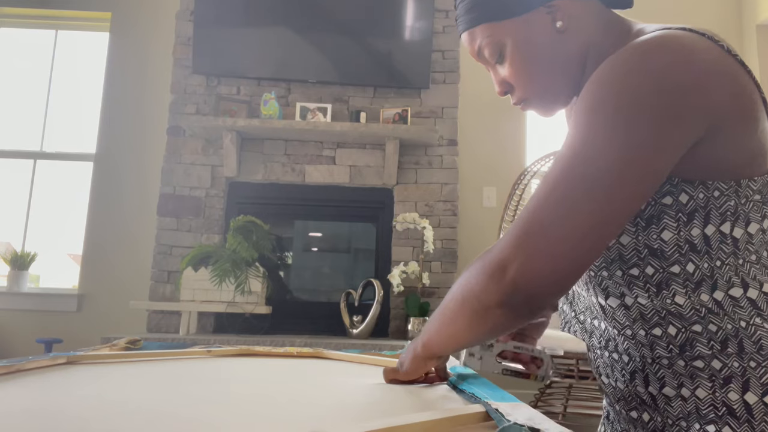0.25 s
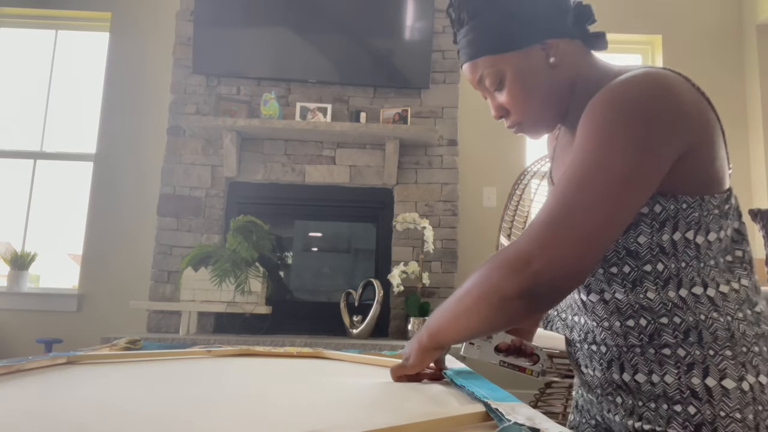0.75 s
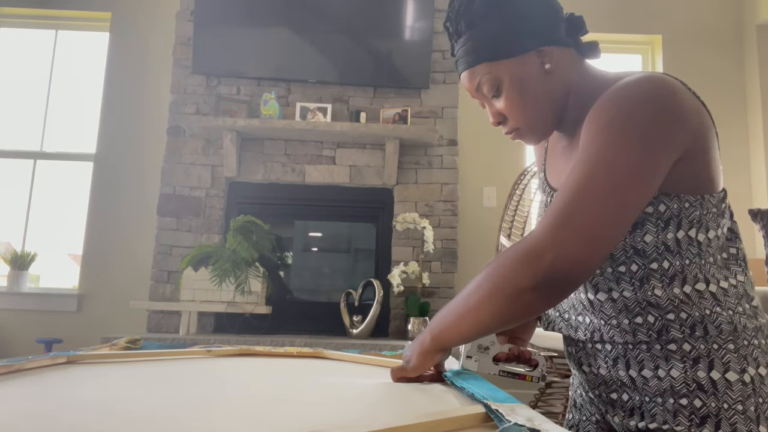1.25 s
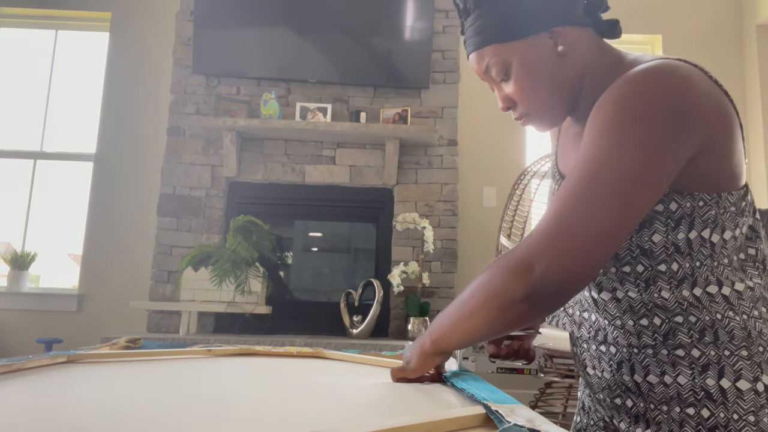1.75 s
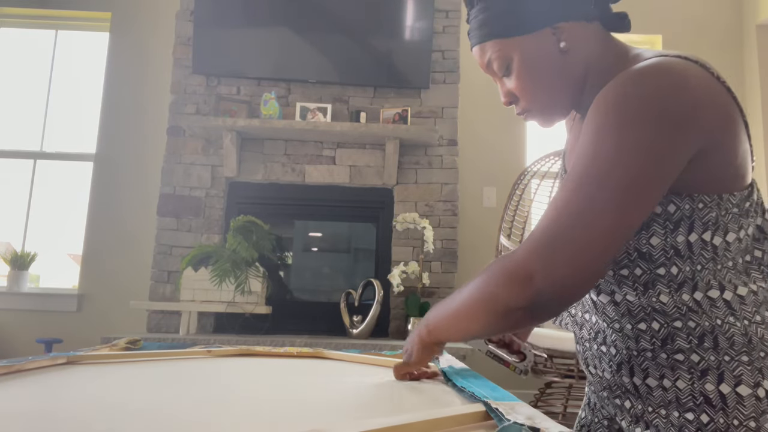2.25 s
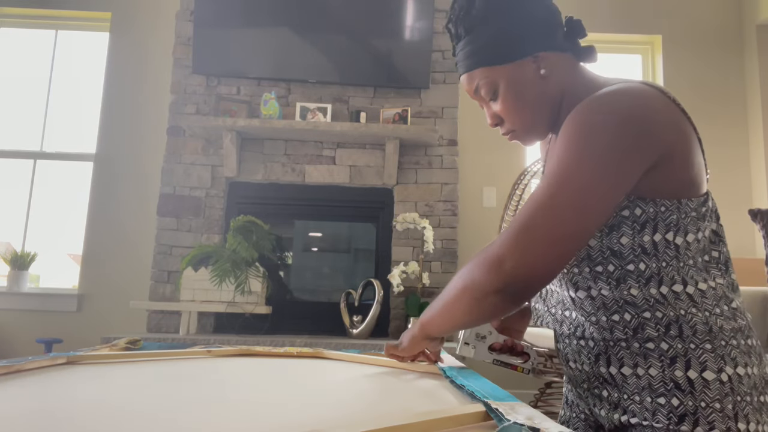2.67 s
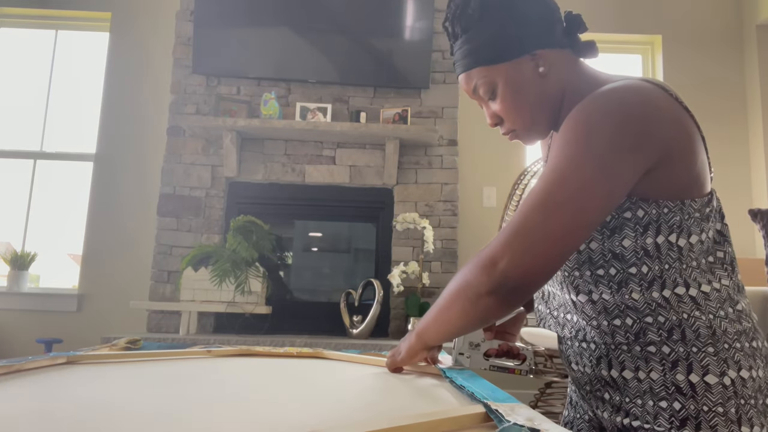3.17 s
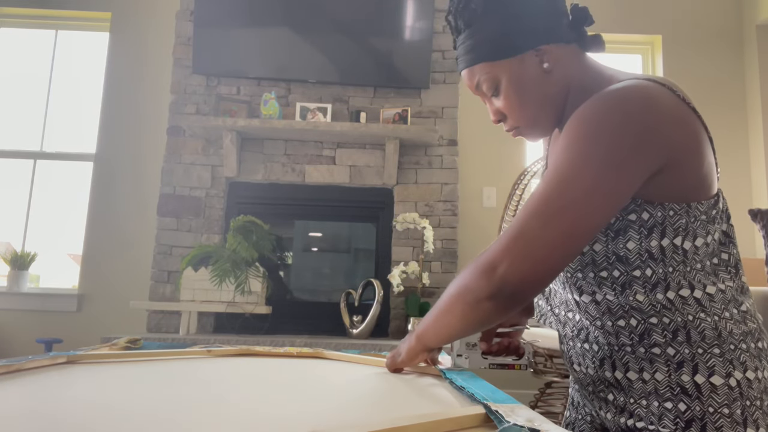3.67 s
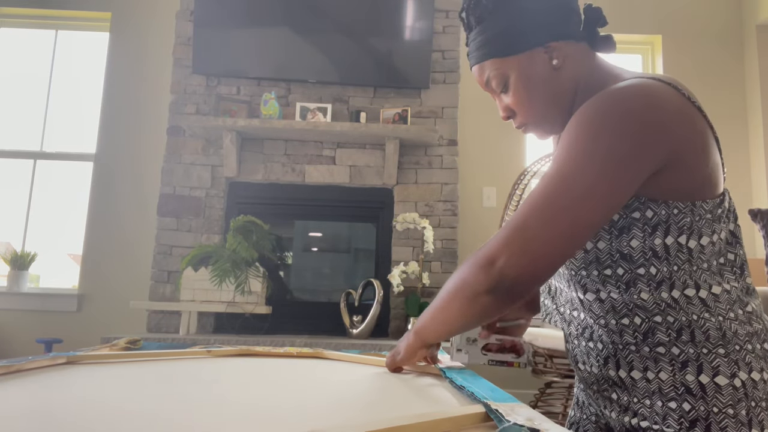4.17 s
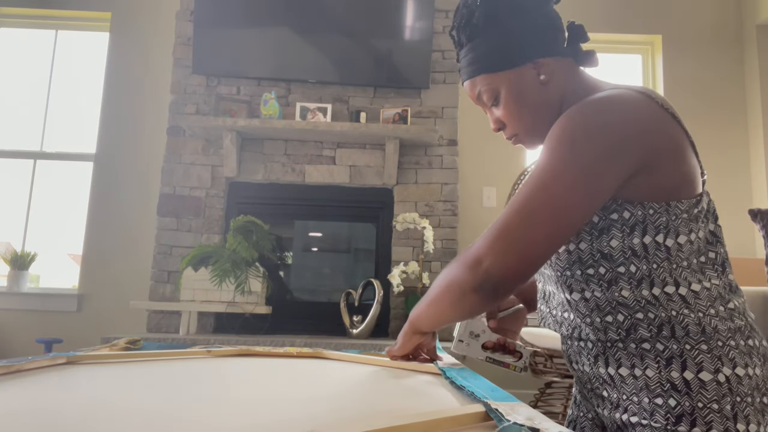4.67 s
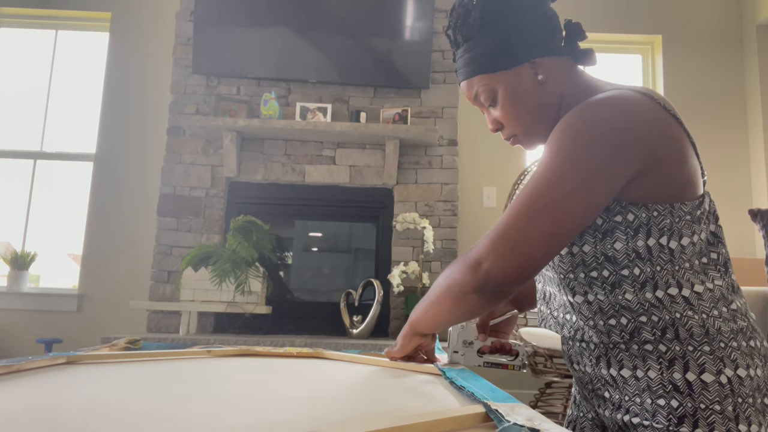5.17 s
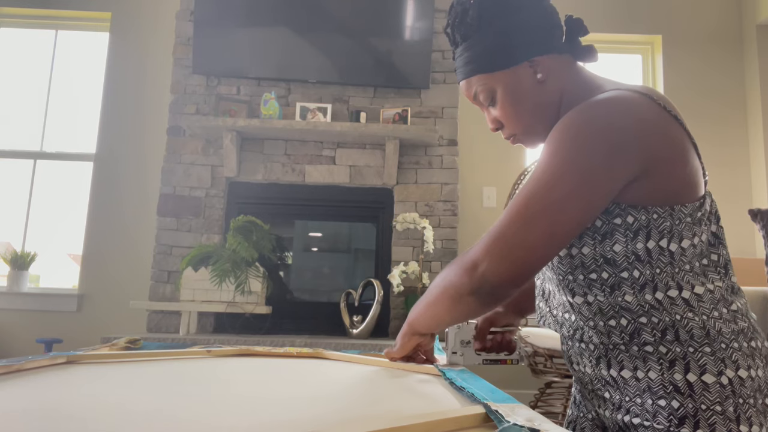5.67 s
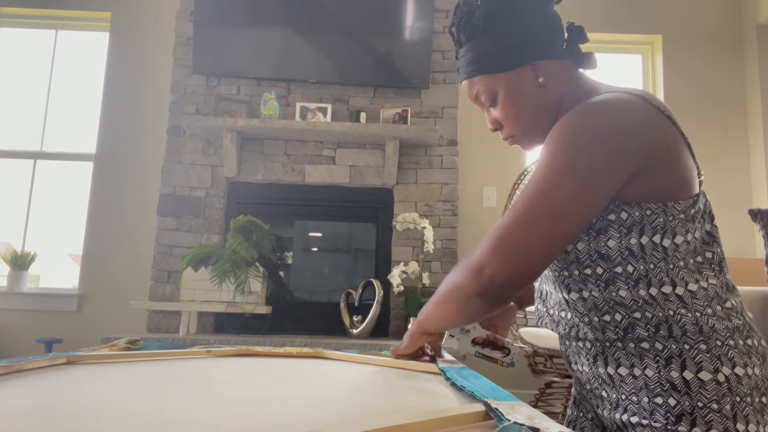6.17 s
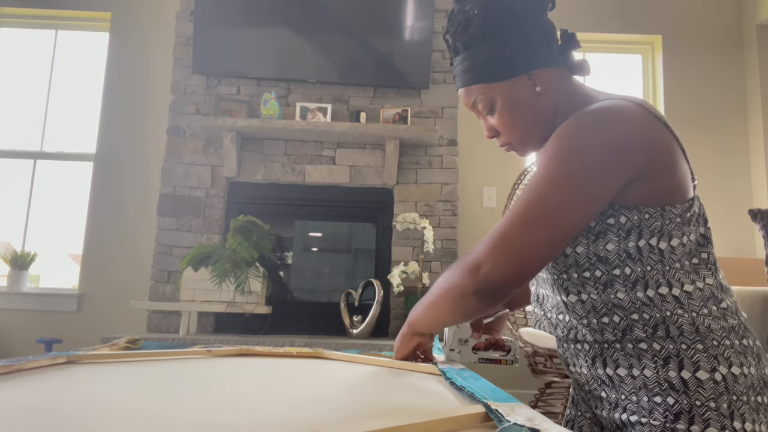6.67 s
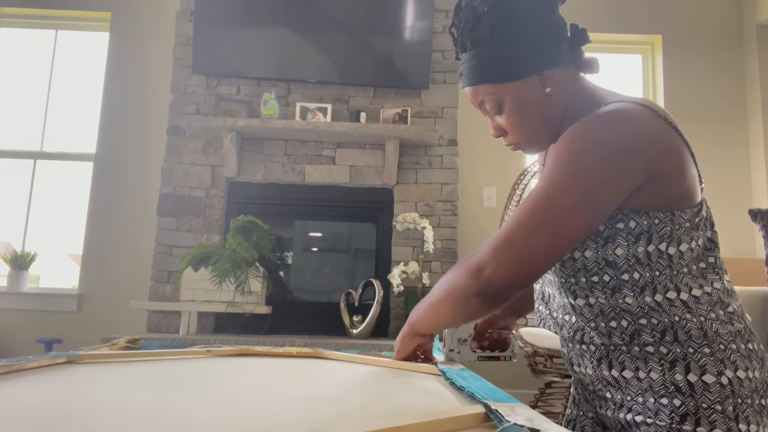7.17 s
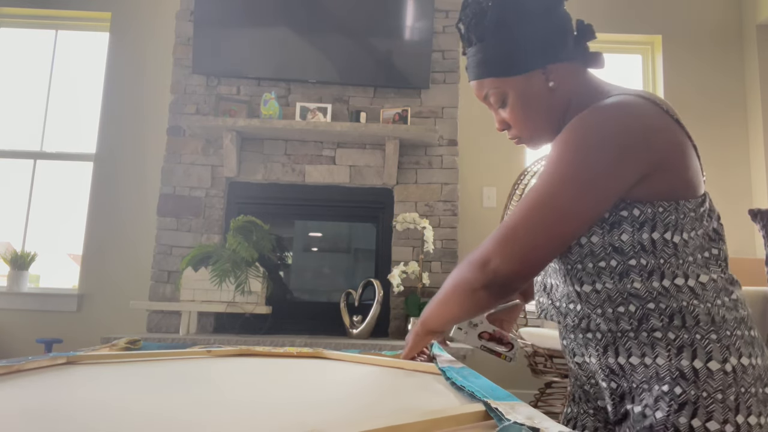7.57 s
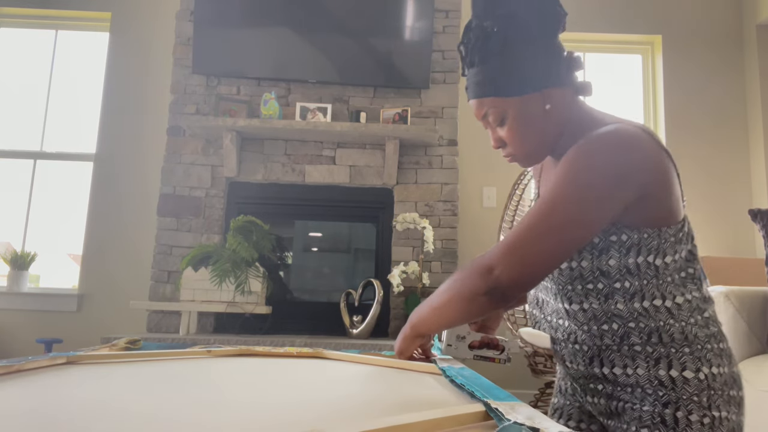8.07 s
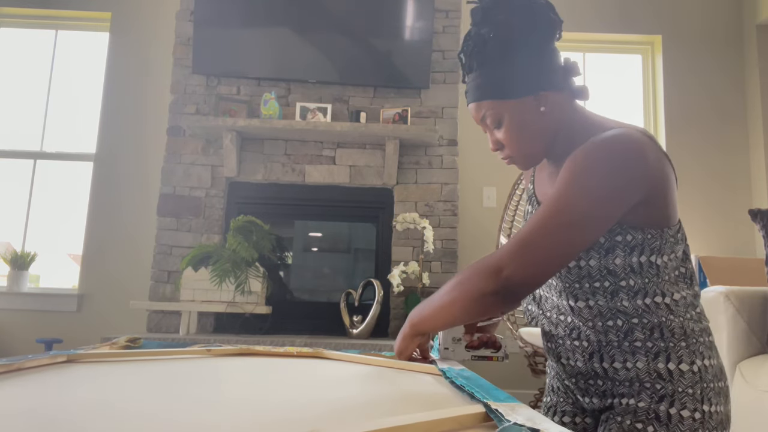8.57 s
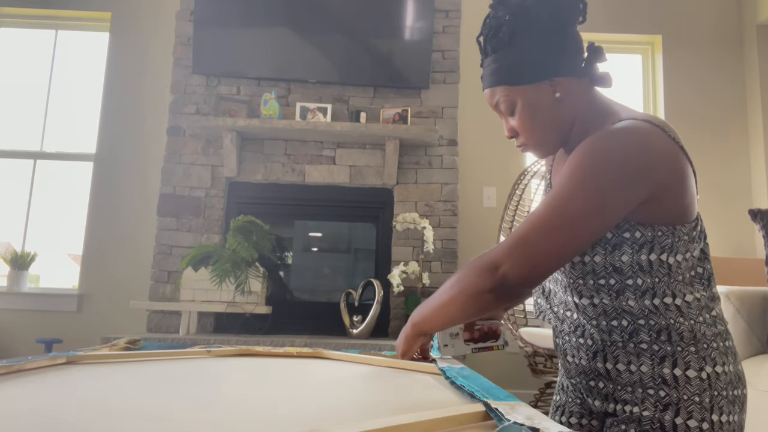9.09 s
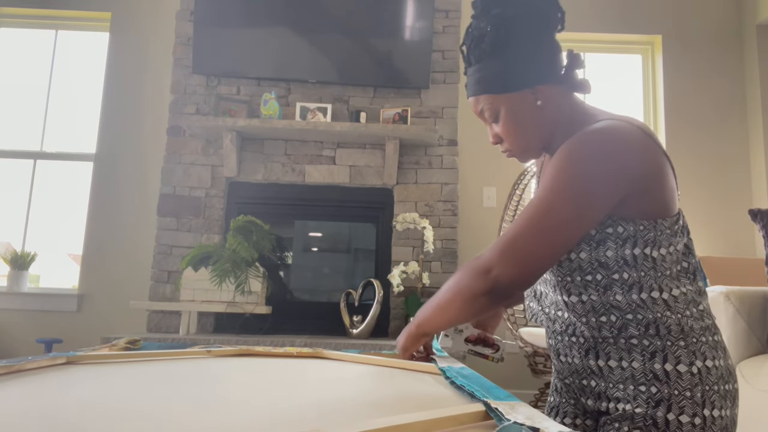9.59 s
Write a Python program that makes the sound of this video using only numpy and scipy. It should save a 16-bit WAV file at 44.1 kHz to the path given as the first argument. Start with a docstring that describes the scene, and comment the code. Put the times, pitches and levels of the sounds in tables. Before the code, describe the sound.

A hand staple gun slams staples into a wooden frame about every two seconds in a lively living room, each squeeze creaking and cocking first.

```python
"""A hand staple gun works along a wooden frame on a table in a large, lively living room with a low hum.
We come in on the ring of a slam; the handle then snaps back, faint pings, ticks and soft bumps follow,
and the next squeeze creaks and cocks before a staple slams home; five such rounds follow the first slam.
Blows are noisy contacts plus ringing modes of steel, casing and wood; cloth brushes before the last slam.
Walls and a dense tail answer each blow, and the recorder's gain control ducks the loud ones."""
import sys
import numpy as np
from scipy import signal
from scipy.fft import rfft, irfft
from scipy.io import wavfile
from scipy.ndimage import uniform_filter1d, minimum_filter1d

SR = 44100
rng = np.random.default_rng(int(sys.argv[2]) if len(sys.argv) > 2 else 0)


def wav_record(signal):
    """Record a signal, one row per channel, as 16-bit PCM in the file named by sys.argv[1]."""
    frames = np.transpose(np.atleast_2d(signal))
    bounded = np.clip(frames, -1, 1)
    # unit amplitude maps onto the largest positive 16-bit level
    quanta = np.round(bounded * 32767).astype(np.int16)
    wavfile.write(sys.argv[1], SR, quanta)


N = 433503
LEAD = SR // 4  # samples computed before time zero and cut off at the end
RUN_UP = 700  # samples of quick rise before a blow
BLOW = 6000  # samples in one blow
CREAK_SWELL_DB = 23.5  # rise of the run-up of catches and ticks over one rattle length
PORT_GAIN_DB = [[0], [0], [-4.0]]  # left port, right port, room

# ringing steel parts of the gun: (frequency [Hz], strength [dB], t60 before damping [s])
STEEL_MODES = [(3187, 2, 0.038), (3726, 3.5, 0.026), (3875, 9, 0.041), (4140, -4, 0.061),
               (4640, -2.5, 0.037), (6320, -13.5, 0.043), (7600, -8.5, 0.021), (11000, -2.5, 0.036),
               (11400, -3, 0.023)]
# ringing wood of the frame: (frequency [Hz], strength [dB], t60 before damping [s])
FRAME_MODES = [(108.4, -5.5, 0.13), (162, -5, 0.13), (204.5, -5, 0.18), (239, -2, 0.08), (314.2, 0, 0.081),
               (386, -6, 0.11), (443, 1.5, 0.052), (488, -9.5, 0.15), (547, 6.5, 0.047),
               (679, -16.5, 0.069), (736, 10, 0.019), (937, -7, 0.095), (1072, -7, 0.15)]


def amp(db):
    """Turns decibels into an amplitude factor."""
    return 10 ** (np.asarray(db) / 20)


def evened(x):
    """Scales a signal to an rms of one."""
    return x / np.sqrt(np.mean(x ** 2) + 1e-20)


def read(points, hz):
    """Reads a curve of (frequency, value) points along a logarithmic frequency axis."""
    f, value = np.transpose(points)
    return np.interp(np.log(hz + 1), np.log(f + 1), value)


def add(mix, s, sound):
    """Lays a sound into the rows of a mix at a time in seconds."""
    start = LEAD + round(s * SR)
    part = mix[:, start:start + sound.shape[-1]]
    part += sound[..., :part.shape[1]]


def loudest(x):
    """The rms amplitude of the loudest 4 ms."""
    return np.sqrt(uniform_filter1d(x ** 2, size=176).max())


def peaked(x, db):
    """Scales a sound so that its loudest 4 ms have the given level."""
    return x * amp(db) / loudest(x)


def patchwork(shape, size_hz, size_time):
    """Random unevenness, smooth over some neighbouring bands and moments."""
    noise = rng.standard_normal(shape)
    across_bands = uniform_filter1d(noise, size=size_hz, axis=0)
    return evened(uniform_filter1d(across_bands, size=size_time, axis=1))


def pair(shape, same):
    """Random spectra for two microphone ports that agree by the share 'same'."""
    a, b, c, d = rng.standard_normal((4,) + shape)
    same = np.clip(same, -1, 1)
    left = a + 1j * b
    return np.array([left, same * left + np.sqrt(1 - same ** 2) * (c + 1j * d)])


def hum():
    """Low household hum: noise with booming pitches, patchy in time and pitch."""
    # spectrum of the hum: (frequency [Hz], density [dB per Hz, relative])
    hum_spectrum = [(18, -43.5), (30, -12.5), (62, -2.5), (165, -6.5), (187, -16), (246, -1.5),
                    (286, -13.5), (761, -25.5), (863, -30), (1500, -30), (1900, -42.5), (12000, -70),
                    (15600, -104), (22000, -120)]
    # booming pitches: (frequency [Hz], width [Hz], boost [dB])
    hum_peaks = [(53.5, 42, 7), (161.6, 3.2, 8), (234, 25, 4)]
    # likeness of the two ports: (frequency [Hz], likeness [-1 to 1])
    hum_same = [(60, 0.88), (180, 0.56), (550, 0.0), (1650, 0), (4970, 0.084), (15000, 0.093)]
    # balance of the ports: (frequency [Hz], left minus right [dB])
    hum_balance = [(60, 3.5), (240, 4.5), (950, -2), (3770, 3.5), (15000, 3.5)]
    level_db = -47
    frames = (N + LEAD) // 1024 + 5
    hz = np.fft.rfftfreq(4096, 1 / SR)[:, None]
    patches_db = 2.5 * patchwork((2049, frames), 9, 5)
    booms_db = sum(db / (1 + (2 * (hz - f) / width) ** 2) for f, width, db in hum_peaks)
    spectra = pair((2049, frames), read(hum_same, hz))
    spectra = spectra * amp(read(hum_spectrum, hz) + booms_db + patches_db)
    spectra = spectra * amp(np.multiply.outer([.5, -.5], read(hum_balance, hz)))
    return amp(level_db) * evened(signal.istft(spectra, nperseg=4096, noverlap=3072)[1][:, :N + LEAD])


def rung(modes, rise, ring=1, pitch=1, spread=0.057, late=0):
    """Every mode rings after a short rise, a little off pitch and strength from blow to blow.
    With 'late', low modes come up later, as slow bending waves do in wood."""
    hz, db, t60 = np.transpose(modes)[:, :, None]
    strength, detune, phase = rng.standard_normal((len(modes), 3)).T[:, :, None]
    n = np.arange(3000)
    t = n / SR
    rise_s = rise * (500 / hz) ** late
    shape = (1 - np.exp(-(t / rise_s) ** 2)) * np.exp(-np.log(1000) * t / (ring * t60))
    waves = np.sin(2 * np.pi * (hz * pitch * (1 + spread * detune) * t + phase))
    tones = amp(db + 2 * strength) * shape * waves
    fade = np.minimum((3000 - n) / 600, 1)
    return np.pad(tones.sum(0) * fade, (0, 3000))


def ringing(modes, db, rise, room_db, blur, ring=1, pitch=1, spread=0.033, late=0):
    """Rows: the ring at the left and right port, and its even spectrum summed over all directions for the room."""
    shared, other = (rung(modes, rise, ring, pitch, spread, late) for _ in range(2))
    near = np.array([shared + 0.18 * other, shared - 1.1 * other])
    near = near * amp(db) / loudest(near[1])
    f = np.fft.rfftfreq(BLOW, 1 / SR)
    power = 0
    for hz, level_db, t60 in modes:
        off_pitch = (f - hz * pitch) * ring * t60 / blur
        power = power + amp(2 * level_db) * t60 ** 2 / (1 + off_pitch ** 2) ** 2
    far = np.roll(irfft(np.sqrt(power)), 600) * signal.windows.tukey(BLOW, .1)
    far = amp(room_db) * far * np.linalg.norm(near[1]) / np.linalg.norm(far)
    return np.array([*near, far])


def wood(db, rise, ring=1, pitch=1, modes=FRAME_MODES, late=0.22):
    """The frame knocks: its wooden modes ring, the low ones rising later."""
    return ringing(modes, db, rise, -4.5, 7.0, ring, pitch, late=late)


def thud(db, pitch=1):
    """A push runs along the wood as a bending wave: the highs arrive first, the lows drag behind."""
    centre_hz, octaves = 399.8 * pitch, .58
    drag = .85  # bending waves take drag / sqrt(Hz) seconds, counted from twice the centre pitch
    hz = np.fft.rfftfreq(BLOW, 1 / SR) + 1
    delay_s = drag * np.maximum(hz ** -.5 - (2 * centre_hz) ** -.5, 0) + .002
    shape = np.exp(-(np.log2(hz / centre_hz) / octaves) ** 2 / 2)
    # the phase is the running sum of the delay over frequency
    wave = irfft(shape * np.exp(-2j * np.pi * np.cumsum(delay_s) * SR / BLOW))
    return peaked(wave, db) * amp([[-1.5], [0], [-4.]])


def sway(db, late_s=0.065):
    """The table rocks a moment after a blow: a short 62 Hz swell, 1.6 times the given level at its height."""
    t = np.arange(8000) / SR
    return amp(db) * 1.6 * np.exp(-((t - late_s) / 0.011) ** 2) * np.sin(2 * np.pi * 62 * t)


def blow(crack, steel_db, length, frame_db, casing_db, bright_db, ring_db, pitch=1, swell_db=48, damping=0.57):
    """A rattle of contacts rises quickly and cracks, and rings the steel, the casing and the wood.
    Rows: left port, right port, and the even spectrum that all directions together send to the room."""
    # hollow gun casing: (frequency [Hz], strength [dB], t60 before damping by the gripping hand [s])
    casing_modes = [(1240, -4.5, 0.064), (1374, 2.5, 0.034), (1560, 0.5, 0.039)]
    own = 0.84  # what each port hears alone, against what both share
    length = max(length, .001)
    n = np.arange(BLOW)
    u = (n - RUN_UP) / SR / length  # time in rattle lengths
    shared, left, right = rng.standard_normal((3, BLOW))
    swell = np.where(u < .3, amp(swell_db * (u - .3) - 4), np.exp(-(1.1 * (u - .3)) ** 2))
    contacts = amp(3.5 * rng.standard_normal(375)).repeat(16) * swell
    impulse = n == RUN_UP + 200
    rattle = np.array([(shared + own * left) * contacts, (shared + own * right) * contacts, impulse])

    hz = np.fft.rfftfreq(BLOW, 1 / SR)
    tilt_db = bright_db * np.log2((hz + 1) / 5000)  # per octave
    snap = irfft(rfft(rattle) * amp(read(crack, hz) + tilt_db)) * signal.windows.tukey(BLOW, .1)
    snap = amp(steel_db) * np.sqrt(0.59 * length * SR) * snap / np.linalg.norm(snap, axis=1, keepdims=True)

    # the steel list stands twice: each part rings as a cluster
    steel = ringing(2 * STEEL_MODES, steel_db + ring_db, .8 * length, 6.0, 5.7, pitch=pitch, spread=0.036)
    casing = ringing(casing_modes, casing_db, 0.34 * length, -8.0, 3.8, damping, spread=0.017)
    rings = steel + casing + wood(frame_db, 1.6 * length)
    return snap + np.pad(rings, ((0, 0), (RUN_UP, 0)))[:, :BLOW]


def slams(tracks):
    """The driver slams a staple home, hits its stop, thuds through the wood and rocks the table."""
    # driver slams: (time [s], steel [dB], rattle length [s], frame [dB], casing [dB], brightness [dB per octave],
    # table sway before its gain [dB], thud [dB], factor on the pitch of the thud)
    slam_list = [(-.095, 0, 0.0024, -12, -15, -1, -35, -19.5, 0.72),
                 (1.7669, -5.5, 0.007, -19, -26.5, -2, -25.5, -18.5, .7),
                 (3.8636, -6, 0.0042, -18, -22.5, 1.5, -24.5, -21, 0.798),
                 (5.5932, -4.5, 0.0044, -17, -19.5, -1, -29, -20.5, .9),
                 (6.9895, -5.5, 0.0045, -17.5, -16.5, 1.4, -30, -19.5, 1.07),
                 (8.8069, -7.5, 0.0067, -18, -15, 0.8, -30, -21, 1.5)]
    # strike spectrum of steel on steel: (frequency [Hz], density [dB per Hz, relative])
    slam_crack = [(880, -15), (1500, -4.5), (3250, 1.5), (3590, 4), (5180, -4), (5970, -3.5), (8870, -11),
                  (12500, 1.5), (13300, -15.5), (14300, -29.5), (15000, -19), (16000, -24), (17000, -62)]
    ring_db, swell_db = -22.5, 21  # steel ring against the crack; rise of the run-up over one rattle length
    room_gain_db = 5.5  # slams fill the room more than they reach the microphones
    seat_s, seat_db, seat_spread = .0055, -6.5, .2  # the driver hits its stop just after the staple bites
    for k, (s, *row, sway_db, thud_db, pitch) in enumerate(slam_list):
        track, ports = tracks[k % 3], tracks[k % 3, :2]
        start_s = s - RUN_UP / SR
        add(track, s, thud(thud_db, pitch))
        slam, seat = (blow(slam_crack, *row, ring_db, swell_db=swell_db, damping=1.0) for _ in range(2))
        add(track, start_s, slam * amp([[0], [0], [room_gain_db]]))
        seat_delay_s = seat_s * (1 + seat_spread * rng.uniform(-1.2, 1))
        add(ports, start_s + seat_delay_s, amp(seat_db) * seat[:2])
        add(ports, s, sway(sway_db))


def releases(tracks):
    """The handle snaps back, steel and casing ringing, and bounces once."""
    # handle snaps: (time [s], steel [dB])
    release_list = [(0.2392, -16.5), (2.105, -17.5), (4.188, -18), (5.9361, -16), (7.3453, -17.5),
                    (9.1689, -16)]
    # strike spectrum of the snap: (frequency [Hz], density [dB per Hz, relative])
    release_crack = [(880, -18), (1360, -8.5), (2000, -8), (3000, -6.5), (3920, -9), (4500, -14),
                     (5000, -11), (5600, -12), (6260, -9.5), (6700, -18.5), (7250, -7), (8000, -15),
                     (9150, -29.5), (10300, -1), (11300, -13.5), (12100, -11), (13000, -14), (14200, -28),
                     (16000, -24.5), (17000, -53)]
    rattle_s, bright_db, frame_db = 0.0039, 3.5, -34  # brightness per octave; frame relative to the steel
    rebound_s, rebound_db = 0.027, -17  # the bounce after the snap
    # casing and ring levels are relative to the steel
    snaps = [(s, db, -6.5, -9.5) for s, db in release_list]
    snaps += [(s + rebound_s, db + rebound_db, -17.5, -3.5) for s, db in release_list]
    for k, (s, db, casing_db, ring_db) in enumerate(snaps):
        snap = blow(release_crack, db, rattle_s, db + frame_db, db + casing_db, bright_db, ring_db)
        add(tracks[k % 3], s - RUN_UP / SR, snap)


def pings(tracks):
    """Faint short pings of one mode, perhaps the handle spring, with stray ones at random moments."""
    # placed pings: (time [s], level of the loudest 4 ms [dB])
    ping_list = [(.7196, -57.5), (.7786, -63.5), (.838, -66.5), (1.0495, -66), (1.1206, -64.5),
                 (1.1867, -62), (1.2486, -64.5), (1.3483, -66), (1.455, -61), (2.6, -65), (2.68, -65.5),
                 (3.2017, -60.5), (3.2964, -57), (3.4046, -69), (5.124, -66), (5.1618, -57.5)]
    ping_mode = (1560, 0, 0.038)  # Hz, dB, t60 in s
    strays, floor_db, spread_db = 60, -72, 3
    draws = rng.uniform(0.015, 1, (strays, 2))
    stray_list = [(u * N / SR, floor_db + spread_db * np.log(1 / v)) for u, v in draws]
    for k, (s, db) in enumerate(ping_list + stray_list):
        ping = rung([ping_mode], 0.0034, spread=0.029)
        add(tracks[k % 3], s, peaked(ping, db) * amp(PORT_GAIN_DB))


def ticks(tracks):
    """Faint creaks and ticks of the mechanism, each a small blow with the ring of one small steel part."""
    # ticks: (time [s], steel [dB], casing [dB], brightness [dB per octave], ring of one small steel part [dB])
    tick_list = [(0.8363, -51, -64.5, -1, -74.5), (1.2723, -71.5, -62, -0.5, -82.5),
                 (1.452, -63.5, -66.5, -1.5, -79), (1.492, -43, -40.5, 2, -53),
                 (1.5549, -41, -42.5, -0.5, -55.5), (2.6789, -66, -76.5, 5.5, -78),
                 (2.7734, -64, -74.5, 2.5, -82), (3.4468, -52, -57, -1, -65.5),
                 (4.6508, -59.5, -60, 2.5, -76), (5.159, -68.5, -66, -3, -78.5),
                 (5.218, -75, -73.5, 1, -80), (5.312, -51.5, -53.5, -3, -58.5),
                 (5.366, -52.5, -48, -2.5, -55), (5.413, -42.5, -60, -2, -46), (7.835, -62, -55, 5.5, -71),
                 (8.3425, -58, -55, -3, -83), (8.3909, -69.5, -61, 0, -78.5), (8.4392, -48.5, -48, 1, -68),
                 (8.535, -56, -56, -0.5, -70.5)]
    # contact spectrum of the ticks: (frequency [Hz], density [dB per Hz, relative])
    tick_crack = [(880, -7.5), (1430, -3.5), (2000, -10.5), (2410, -10), (3000, -10.5), (3600, -6.5),
                  (4400, -9), (5600, -13.5), (7400, -17.5), (8800, -26), (10200, -14), (13000, -23),
                  (17000, -55)]
    rattle_s, frame_db, ring_db = 0.0093, -58, -13  # ring relative to the steel
    for k, (s, db, casing_db, bright_db, part_db) in enumerate(tick_list):
        tick = blow(tick_crack, db, rattle_s, frame_db, casing_db, bright_db, ring_db, swell_db=CREAK_SWELL_DB)
        add(tracks[k % 3], s - RUN_UP / SR, tick)
        part = ringing(STEEL_MODES[4:5], part_db, 0.0015, -8, 9, ring=.8, pitch=1.01, spread=.02)
        add(tracks[k % 3], s, part)


def bumps(tracks):
    """Soft bumps on the frame: a thud, a knock of the wood and a sway of the table."""
    # bumps: (time [s], ring [dB], factor on the pitch of the frame and the thud,
    # table sway before its gain [dB], thud [dB])
    bump_list = [(.869, -41, 0.57, -41, -44), (2.869, -48.5, 0.67, -51, -50.5),
                 (4.349, -49.5, 0.86, -66, -53.5), (4.926, -46.5, 0.87, -42, -46),
                 (5.418, -47, 1, -44, -49.5), (8.039, -49, 0.74, -48, -52), (8.628, -49.5, .85, -42, -53.5),
                 (9.738, -43, 0.71, -48.5, -44.5)]
    rise_s, ring, late = .0025, 1.9, 1.5  # rise at 500 Hz; factor on the ring time; lag of the low modes
    for k, (s, db, pitch, sway_db, thud_db) in enumerate(bump_list):
        add(tracks[k % 3], s, thud(thud_db, pitch))
        # a soft push rings only the low modes
        add(tracks[k % 3], s, wood(db, rise_s, ring, pitch, FRAME_MODES[1:9], late))
        add(tracks[k % 3, :2], s, sway(sway_db, 0.049))


def cocks(tracks):
    """The squeezed handle catches as it cocks the driver; the loaded spring rings higher."""
    # catches: (time [s], steel [dB], rattle length [s], frame [dB], casing [dB])
    cock_list = [(1.598, -39, 0.0045, -39.5, -40), (1.6172, -20.5, .0035, -47, -30),
                 (3.531, -42, 0.0086, -39.5, -39), (3.557, -43, .006, -46, -44.5),
                 (3.5877, -24, .0035, -40.5, -36), (5.4528, -36.5, 0.0067, -37, -36.5),
                 (5.466, -18.5, 0.004, -46, -28.5), (6.699, -25, 0.0073, -35, -23.5),
                 (6.818, -37, 0.0032, -47.5, -30), (6.826, -22, .0035, -44, -23),
                 (8.588, -33, .005, -42, -31.5), (8.595, -21.5, 0.0048, -38.5, -37)]
    # contact spectrum of the catch: (frequency [Hz], density [dB per Hz, relative])
    cock_crack = [(880, -10), (1500, -5.5), (2300, -7.5), (3500, -2.5), (3800, -3.5), (4100, -4.5),
                  (4490, -6), (4900, -5.5), (5500, -6), (6200, -7.5), (7200, -8.5), (8000, -15.5),
                  (9150, -20.5), (10200, -5), (12200, -8), (14200, -21.5), (16000, -24.5), (17000, -57.5)]
    bright_db, ring_db = 2, -13.5  # brightness per octave; ring relative to the steel
    pitch, damping = 1.045, .8  # factors on the steel pitch and on the ring time of the casing
    thud_db = -7.5  # relative to the ring of the frame
    for k, (s, db, length, frame_db, casing_db) in enumerate(cock_list):
        catch = blow(cock_crack, db, length, frame_db, casing_db, bright_db, ring_db, pitch,
                     CREAK_SWELL_DB, damping)
        add(tracks[k % 3], s - RUN_UP / SR, catch)
        add(tracks[k % 3], s, thud(frame_db + thud_db, 1.2))


def rustle():
    """Cloth and hands brush softly as the hand closes: grainy hiss, unrelated at the two ports."""
    # course of the brushing: (time [s], level [dB])
    rustle_points = [(7.98, -89), (8.089, -76), (8.2, -79), (8.3, -78.5), (8.421, -80.5), (8.5, -57)]
    peak_hz, width_hz, peak_db = 2700, 740, 5
    s, db = np.transpose(rustle_points)
    t = np.arange(s[0], s[-1], 1 / SR)
    grain = amp(2.2 * evened(uniform_filter1d(rng.standard_normal(len(t)), 300)))
    band = signal.butter(2, [1800, 6500], "band", fs=SR, output="sos")
    hiss = signal.sosfilt(band, rng.standard_normal((3, len(t))) * grain)
    resonance = signal.iirpeak(peak_hz, peak_hz / width_hz, fs=SR)
    hiss = hiss + amp(peak_db) * signal.lfilter(*resonance, hiss)
    return s[0], evened(hiss) * amp(np.interp(t, s, db)) * signal.windows.tukey(len(t), .2)


def gun():
    """All blows, dealt in turn to three tracks so that each meets another part of the room."""
    tracks = np.zeros((3, 3, N + LEAD))  # track, row (left port, right port, room), sample
    for source in (slams, releases, pings, ticks, bumps, cocks):
        source(tracks)
    add(tracks[0], *rustle())
    return tracks


def walls(near):
    """Thin, bright slaps from the far walls, without lows: delayed, band-passed copies of the blows."""
    # far walls: (delay [s], left [dB], right [dB])
    echo_list = [(0.0312, -16.5, -13.5), (0.0333, -13.5, -14.5)]
    thin = signal.sosfilt(signal.butter(4, [2400, 9000], "band", fs=SR, output="sos"), near)
    return sum(amp([[left_db], [right_db]]) * np.roll(thin, round(s * SR), axis=1)
               for s, left_db, right_db in echo_list)


def room(x):
    """A dense tail of random reflections that builds up and dies band by band."""
    # decay of the room: (frequency [Hz], t60 [s])
    room_t60 = [(60, 0.19), (250, 0.6), (1000, 0.85), (3000, 0.84), (4000, 0.76), (6000, 0.69),
                (12000, 0.45)]
    # colour of the tail: (frequency [Hz], level [dB, relative])
    room_colour = [(60, -9), (150, -1.5), (300, -0.5), (600, -2), (790, -6.5), (1000, -4.5), (2500, -3.5),
                   (4000, -10), (8300, -0.5), (8800, -5), (9400, -16), (9800, -8), (11200, -10.5),
                   (12900, -8.5), (13500, -20.5)]
    # likeness of the two ports: (frequency [Hz], likeness [-1 to 1])
    room_same = [(60, 0.59), (150, 1), (380, 0.04), (560, -0.48), (950, -0.17), (2380, 0.07), (5980, -0.17),
                 (15000, 0.26)]
    early_s, early_db = .029, -1  # the room stays thinner until sound returns from the far walls
    hz, t = np.fft.rfftfreq(256, 1 / SR)[:, None], np.arange(900) * 64 / SR
    colour_db = read(room_colour, hz) + 1.3 * patchwork((129, 900), 6, 16)  # uneven reflections
    decay_db = -60 * t / read(room_t60, hz)
    spectra = pair((129, 900), read(room_same, hz)) * amp(colour_db + decay_db)
    tail = signal.istft(spectra, nperseg=256, noverlap=192)[1]
    tail_s = np.arange(tail.shape[1]) / SR
    tail = tail * (1 - np.exp(-(tail_s / 0.0051) ** 2))
    tail = tail * amp(early_db * np.clip((early_s - tail_s) / 0.0024, 0, 1))
    tail = amp(-5.5) * tail / np.linalg.norm(tail[0])
    return signal.fftconvolve(np.float32(x[None]), np.float32(tail), axes=1)[:, :len(x)]


def ducked(x):
    """The recorder's gain control ducks on loud blows, holds, then lets go."""
    hold_s, duck_s, threshold_db = 0.14, 0.0074, -15  # duck_s smooths the gain
    recover, share = 93, 0.94  # fall of the held level in dB per s; share of the excess taken off
    power_db = 10 * np.log10(abs(uniform_filter1d((x ** 2).mean(0), size=400)) + 1e-12)
    half = round(hold_s * SR / 2)
    held_db = -minimum_filter1d(-power_db, size=2 * half + 1, origin=half)  # loudest of the last hold_s
    fall = np.arange(x.shape[1]) * recover / SR
    recovering_db = np.maximum.accumulate(held_db + fall) - fall
    over_db = np.maximum(recovering_db - threshold_db, 0)
    step = 1 / (duck_s * SR)
    return x / amp(signal.lfilter([step], [1, step - 1], share * over_db))


def scene():
    """The gun on its frame, the far walls, the room and the hum, all through the gain control."""
    tracks = gun()
    left, right, _ = tracks.sum(0)
    # the gun is right of the microphones: its sound reaches the left port 6 samples later
    near = np.array([amp(3.0) * np.roll(left, 6), amp(0.4) * right])
    tails = sum(room(track[2]) for track in tracks)
    return ducked(near + walls(near) + tails + hum())[:, LEAD:]


def record(dry):
    """Small microphones lose the deep bass; peaks round off; then the band limit."""
    dry = signal.sosfilt(signal.butter(2, 42, "high", fs=SR, output="sos"), dry)
    rounded = np.tanh(1.5 * dry) / 1.4
    low_pass = signal.firwin(511, 17150, window=("kaiser", 9), fs=SR)
    return signal.oaconvolve(rounded, low_pass[None], "same")


dry = scene()
out = record(dry)
wav_record(out)
```